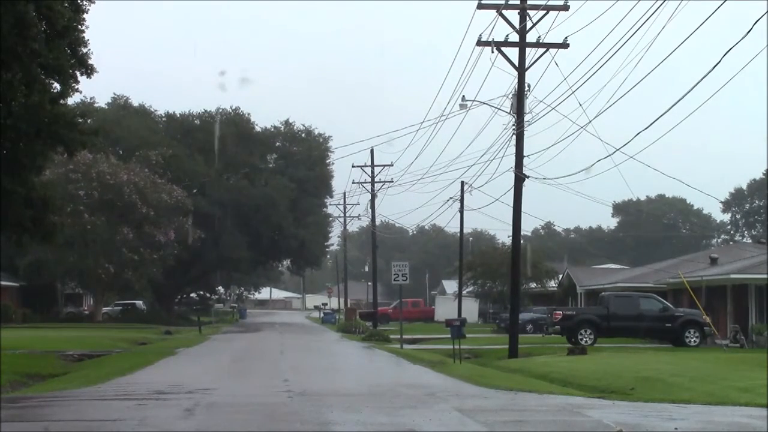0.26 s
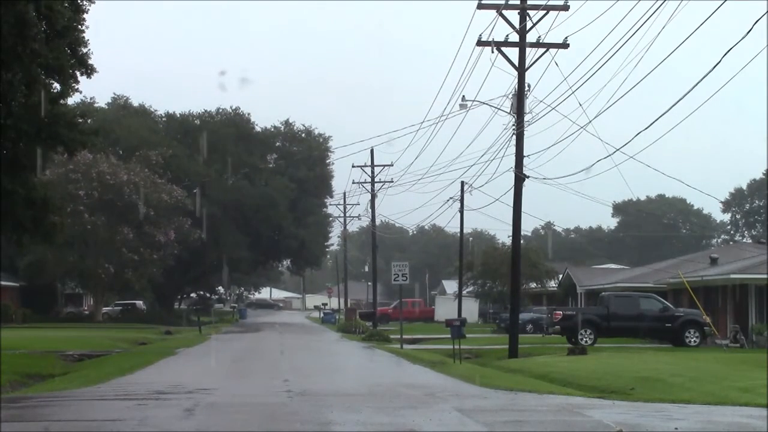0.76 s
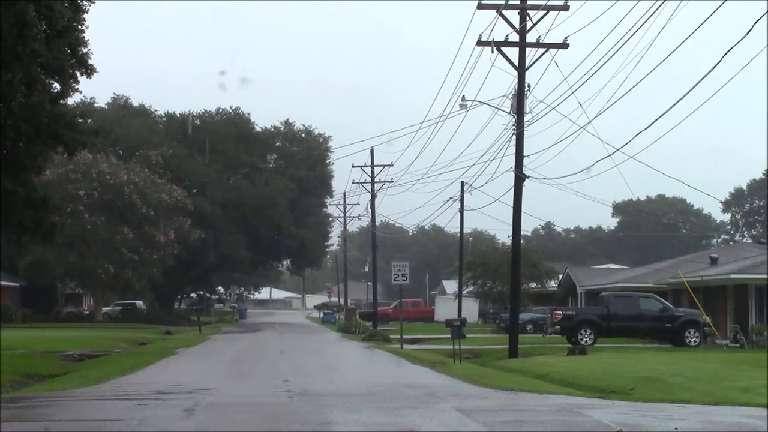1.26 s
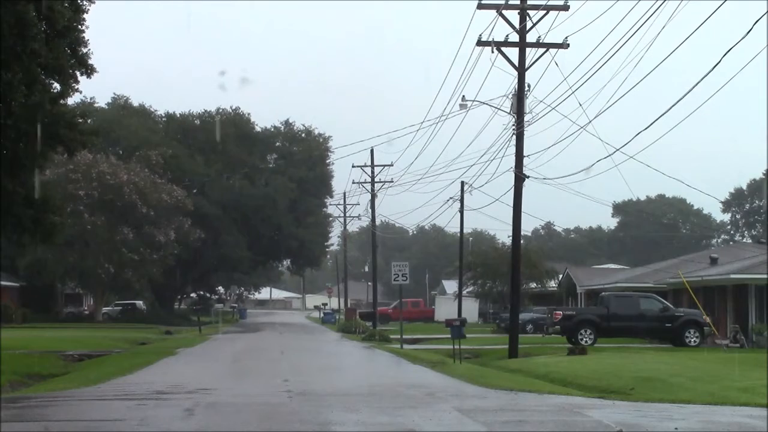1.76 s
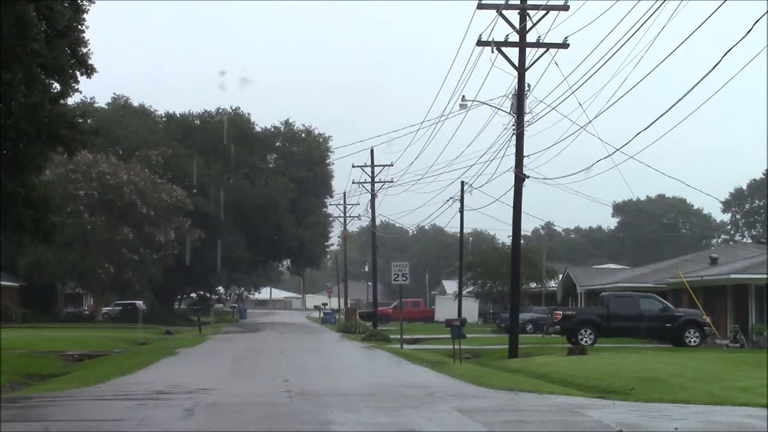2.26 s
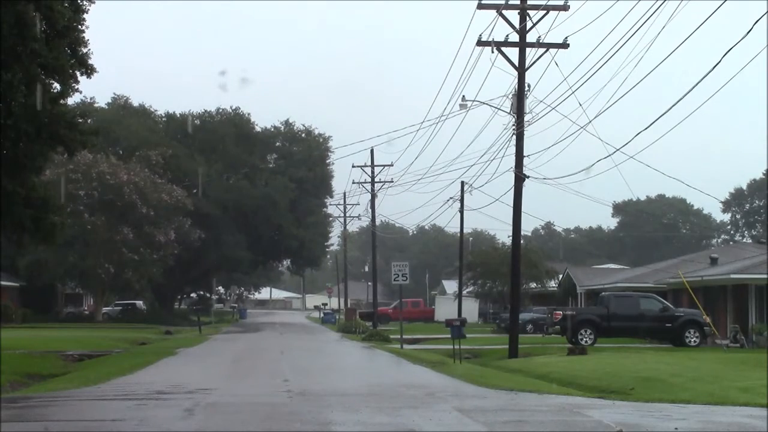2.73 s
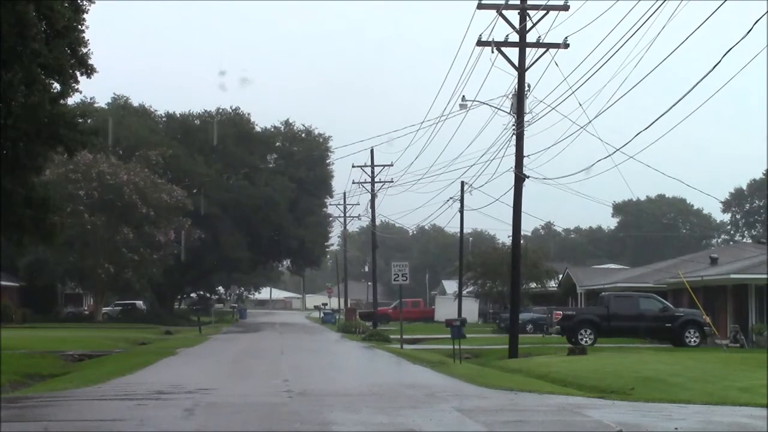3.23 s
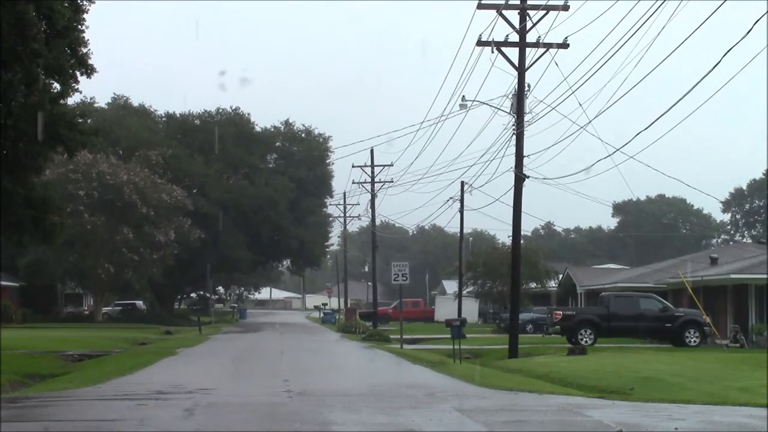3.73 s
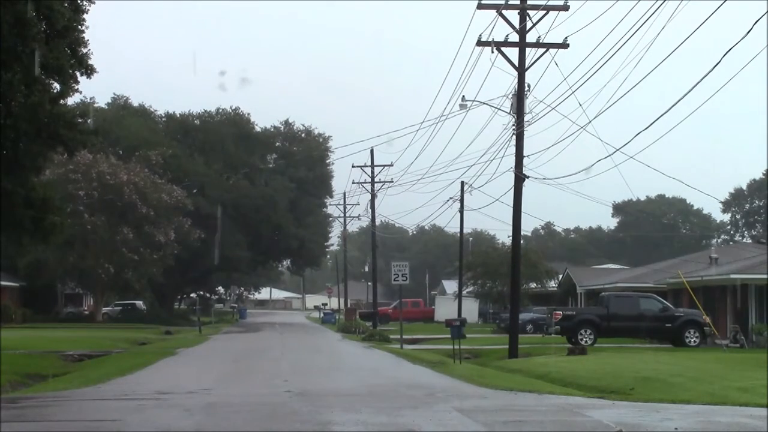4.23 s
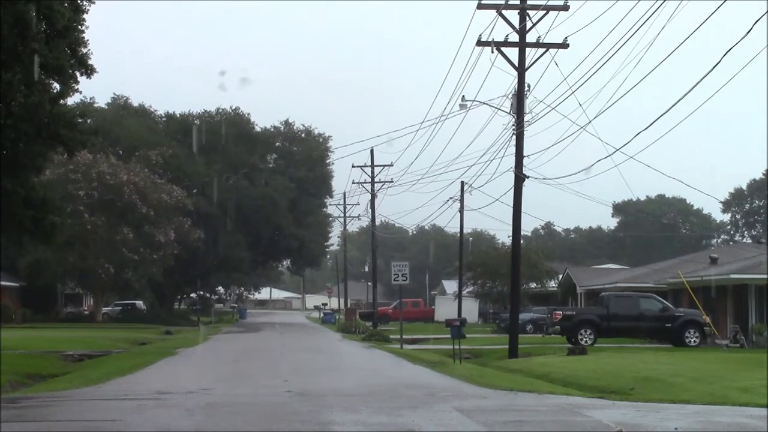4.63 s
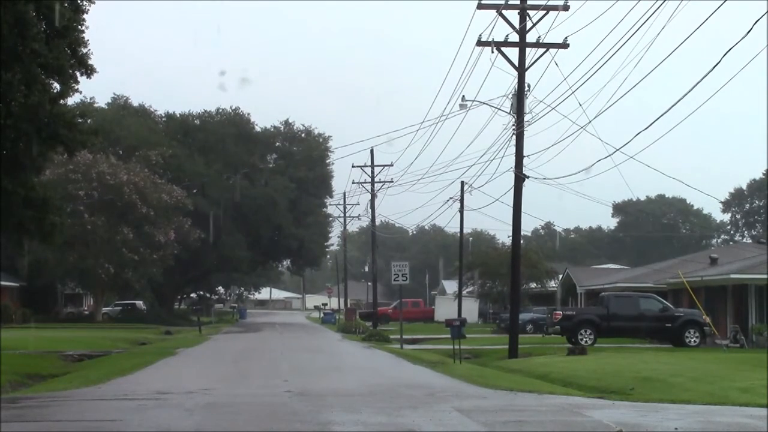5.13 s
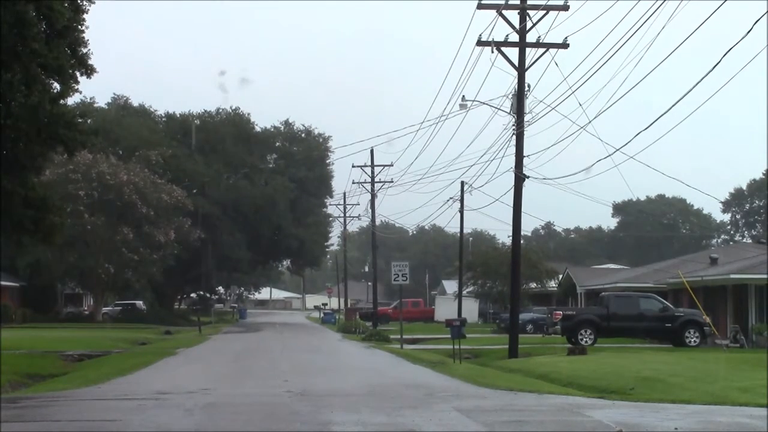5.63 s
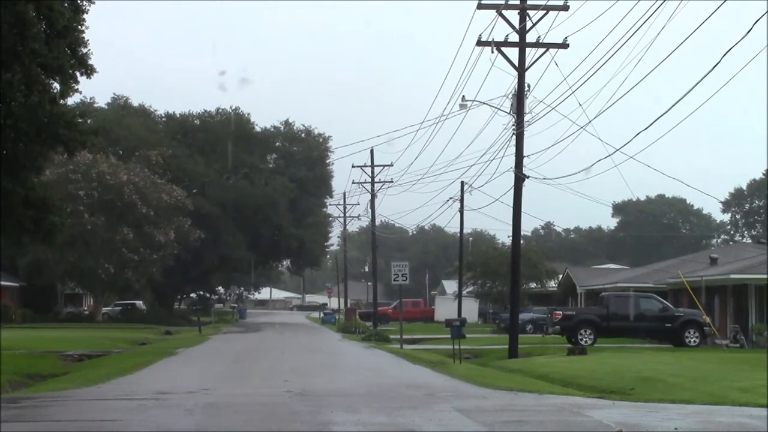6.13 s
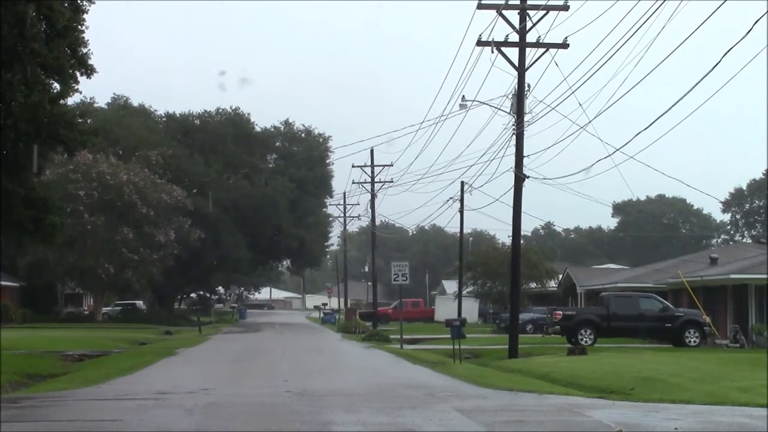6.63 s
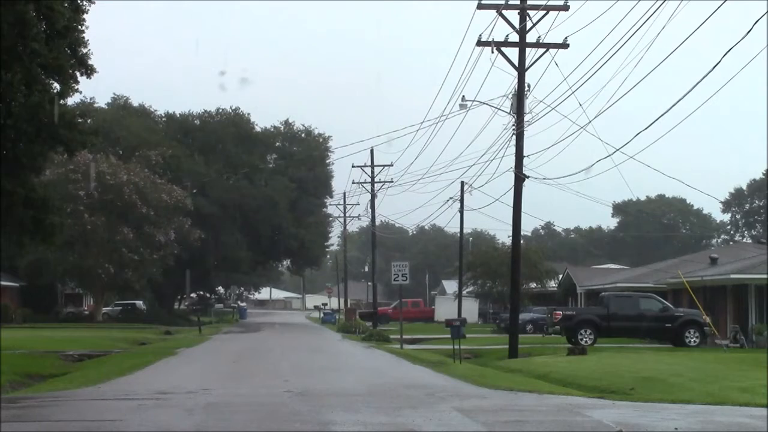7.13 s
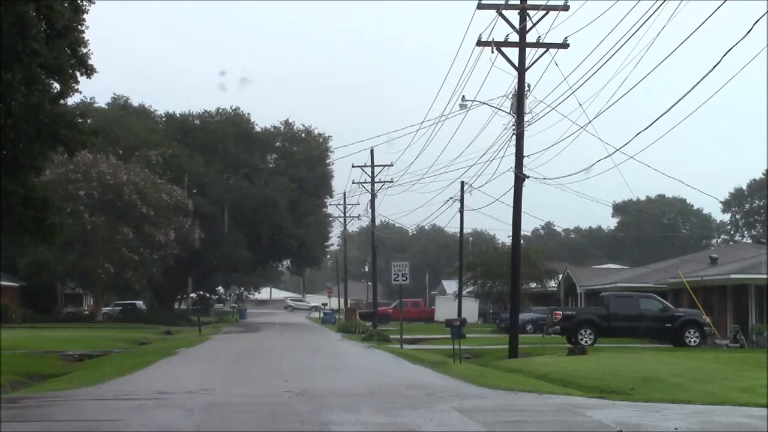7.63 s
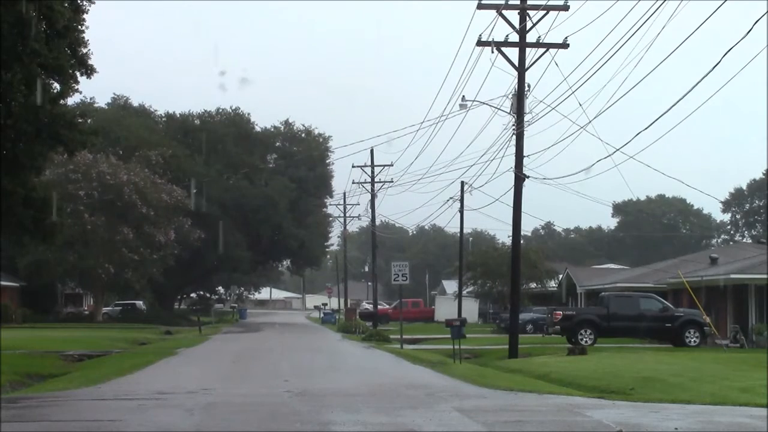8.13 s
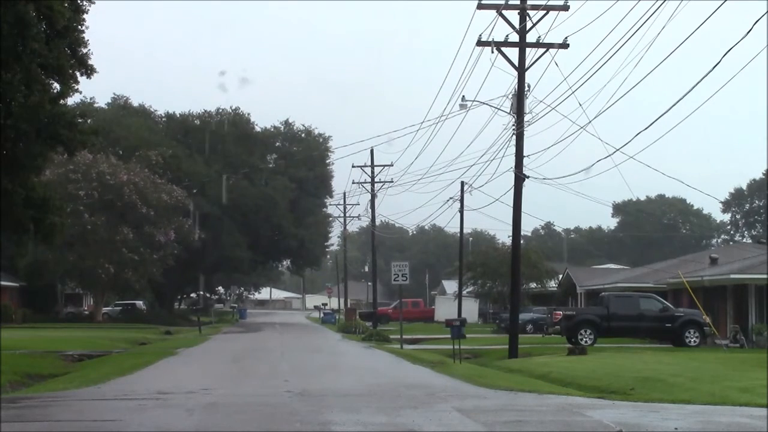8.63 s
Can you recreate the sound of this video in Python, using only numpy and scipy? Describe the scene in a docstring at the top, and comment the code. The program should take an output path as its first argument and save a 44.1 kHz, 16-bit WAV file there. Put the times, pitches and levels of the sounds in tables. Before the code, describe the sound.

Steady rain on a residential street, heard from under a covered porch through a small microphone with little deepest bass. A mid-to-bright grainy hiss runs throughout, with fine patter and treble fizz. Fat eave drips hit wet concrete irregularly, several each second: clattering splats with soft spray tails, one especially strong near 3.9 s. A few dull hollow knocks come between 0.4 and 2.5 s, and thin bright ticks at about 0.8 and 7.5 s. A low thunder tail starts the scene, swells weakly around 1 s, and fades, nearly gone by 3.5 to 4.4 s. At 4.5 s a nearer roll enters suddenly, booming in quick uneven surges with a rough growl and slight crackle, and peaks around 5.9 s, covering the rain. It drops after about 6.2 s, rumbles on with lumpy swells near 7 to 8 s, and remains as a softer grumble until the end at about 8.9 s.

```python
"""Fat drips splat on wet concrete in steady rain, on a residential street heard from under a porch.
The tail of one thunder roll fades; a nearer roll arrives suddenly at 4.5 s, peaks and eases.
Thunder is banded random shocks through porch resonances, shaped by short surges and dips.
Rain is dense clicks and noise; drips are ringing splats with spray and mist.
Knocks, ticks, patter and fizz are short noise bursts or click rings."""
import sys
import numpy as np
from scipy import signal
from scipy.io import wavfile
from scipy.ndimage import uniform_filter1d

SR = 44100
rng = np.random.default_rng(int(sys.argv[2]) if len(sys.argv) > 2 else 0)


def inscribe(sig):
    """Save sig as 16-bit PCM at rate SR to the path in sys.argv[1].

    A 1-D sig is mono; a 2-D sig holds one channel per row.
    Samples are clipped to [-1, 1] before scaling.
    """
    pcm = np.round(np.clip(np.atleast_2d(sig).T, -1, 1) * 32767)
    wavfile.write(sys.argv[1], SR, pcm.astype(np.int16))


N = 391166

# Thunder range levels before surges and dips: time_s, deep_db, low_db, boom_db, upper_boom_db, growl_db
ROLL_LEVELS = [(0.0, -39, -57, -39, -44.5, -50), (0.16, -67, -57, -46, -47.5, -56.5),
               (0.9, -56, -49, -40, -42.5, -54.5), (1.15, -61, -66, -43.5, -50.5, -51.5),
               (1.22, -64, -56.5, -49.5, -48.5, -60.5), (2.01, -68, -62, -46.5, -54, -58),
               (2.52, -64, -51.5, -45, -49.5, -58), (2.69, -69, -60, -51.5, -51.5, -59),
               (2.96, -58, -49.5, -45, -59, -60.5), (2.98, -55, -53.5, -45.5, -49.5, -57.5),
               (3.51, -75, -60.5, -56, -56.5, -59.5), (4.43, -79, -71, -49, -47, -48.5),
               (4.48, -63, -64, -46, -45, -53), (4.5, -66, -42, -26.5, -36.5, -49),
               (4.69, -66, -47, -32, -40, -42.5), (4.78, -54, -46, -30.5, -36, -43),
               (4.84, -65, -38, -29, -30, -39), (4.99, -58, -30, -32, -33, -30),
               (5.09, -64, -43, -24.5, -31.5, -38), (5.21, -52, -32, -38, -34, -33.5),
               (5.29, -53, -45, -27.5, -26.5, -31), (5.4, -64, -34, -31.5, -29, -33.5),
               (5.49, -50, -38.5, -40, -29.5, -31.5), (5.58, -46, -33.5, -27.5, -28.5, -34.5),
               (5.71, -50, -40, -25.5, -29, -34.5), (5.85, -43, -27.5, -24.5, -18, -30),
               (5.89, -46, -34, -16.5, -24, -28), (6.07, -47, -39, -33.5, -26.5, -32),
               (6.12, -50, -46, -23, -27.5, -32.5), (6.64, -61, -49.5, -38.5, -37.5, -39),
               (7.68, -62, -46, -33, -33.5, -38), (8.05, -69, -54.5, -47.5, -39, -38.5),
               (8.19, -56, -62, -37.5, -32.5, -38.5), (8.55, -60, -39, -41.5, -31.5, -33),
               (8.7, -63, -57, -35.5, -37, -36.5), (8.75, -55, -36.5, -40.5, -34.5, -36),
               (8.87, -71, -54, -39, -35, -34.5)]
# Roll spectrum, relative within each range: freq_hz, level_db
ROLL_SPECTRUM = [(15, -65), (40, -22), (59, -34), (100, -12.5), (182, 3.5), (285, -6.5), (356, -11),
                 (468, -15.5), (528, -19.5), (706, -24), (782, -20), (961, -37), (1140, -36), (1500, -41.5),
                 (1950, -74), (3300, -120)]
# Crackle relative to growl: time_s, level_db
CRACKLE_LEVELS = [(0.0, -22), (4.4, -8), (5.0, -13.5), (5.9, -14), (7.0, -9), (7.6, -9), (8.1, -11),
                  (8.87, -12.5)]
DEEP_SURGE_SHARE = 0.6   # share of the boom change given to the deep and low ranges
FAR_TILT_END_S, FAR_TILT_DB = 4.0, 4   # tilt toward the low end; fades out over the last second


def thunder():
    """Countless shocks from the crooked channel arrive smeared together; each range swells on its own."""
    deep_db, low_db, boom_db, upper_db, growl_db = in_time(ROLL_LEVELS)
    crackle_db = in_time(CRACKLE_LEVELS)[0]
    boom_change_db, growl_change_db = surges()
    deep_change_db = DEEP_SURGE_SHARE * boom_change_db

    edges_hz = 25 * 2 ** (np.arange(2, 19) / 3)
    shocks = [impacts(3000, spread_db=2.0, size=N) for _ in range(2)]
    bands = coloured(shocks, ROLL_SPECTRUM, edges_hz, patchy_db=1.0, rate_hz=9)
    ranges = np.split(bands, np.searchsorted(edges_hz, [79, 125, 199, 300, 620]))

    far_db = FAR_TILT_DB * np.clip(FAR_TILT_END_S - np.arange(N) / SR, 0, 1)
    for k in (3, 4):   # upper boom and growl
        tilt = np.linspace(1, -2, len(ranges[k]))
        ranges[k] = ranges[k] * from_db(np.outer(tilt, far_db))

    levels_db = (deep_db + deep_change_db,
                 low_db + deep_change_db,
                 boom_db + boom_change_db,
                 upper_db + boom_change_db,
                 growl_db + growl_change_db,
                 growl_db + growl_change_db + crackle_db)
    roll = np.zeros(N)
    for level_db, part in zip(levels_db, ranges):
        roll += from_db(level_db) * evened(porch(part.sum(0)), seconds=0.035, share=0.15)
    return roll


# Short surges and dips in the roll: start_s, boom_change_db, growl_change_db, length_s
ROLL_SURGES = [(0.423, 5, 2, 0.06), (0.735, 2.5, -8, 0.051), (1.021, 5.5, 1, 0.023), (1.1, 7.5, 0, 0.068),
               (2.982, 3, 1, 0.036), (4.224, 5, 4.5, 0.053), (4.497, 3, -6, 0.04), (4.585, 4.5, 7, 0.038),
               (4.735, 6, 3, 0.043), (4.874, 6, 2.5, 0.043), (4.962, 12, -1.5, 0.022),
               (5.043, -1, 2.5, 0.064), (5.222, 2, 4.5, 0.05), (5.406, 4.5, 0.5, 0.054),
               (5.52, 7.5, 1, 0.085), (5.603, -1.5, 7, 0.047), (5.704, 1.5, 3.5, 0.036),
               (5.805, -1, -0.5, 0.14), (5.928, 10.5, 3, 0.011), (5.973, 5.5, 1, 0.031),
               (6.08, 5.5, 0, 0.068), (6.175, 7.5, 0, 0.015), (6.267, 5.5, 1.5, 0.065),
               (6.32, 5, 0.5, 0.05), (6.463, 4.5, 1, 0.18), (6.927, 8.5, -1, 0.021),
               (6.974, 8.5, -6, 0.022), (7.142, 4.5, -2.5, 0.075), (7.342, 5, 4.5, 0.084),
               (7.516, -2, 4.5, 0.16), (7.676, 3.5, 3.5, 0.029), (7.826, 5, 0.5, 0.047),
               (7.975, 9, -1, 0.087), (8.217, 4.5, 4.5, 0.036), (8.347, 6.5, -5, 0.022),
               (8.48, -3, -4, 0.052), (8.707, 4, 2, 0.03)]
SURGE_RISE_S = 0.027


def surges():
    """Each row shifts boom and growl levels up or down quickly, then lets them return; both curves in dB."""
    t, change_db = np.arange(N) / SR, np.zeros((2, N))
    for start_s, *peak_change_db, length_s in ROLL_SURGES:
        after_s = np.maximum(t - start_s, 0)
        shape = (1 - np.exp(-after_s / SURGE_RISE_S)) * np.exp(-(after_s / length_s) ** 2)
        change_db += np.outer(peak_change_db, shape / shape.max())
    return change_db


# Porch resonances, in series: freq_hz, width_hz, boost_db
PORCH_RESONANCES = [(174.3, 15.5, 3.5), (194, 650, 5), (535.3, 39, 6.5), (811, 76, 6), (1138, 32, 8.5),
                    (1350, 90, 3.5)]


def porch(x):
    """The covered porch lifts a few resonances."""
    for hz, width_hz, boost_db in PORCH_RESONANCES:
        x = x + (from_db(boost_db) - 1) * resonance(x, hz, width_hz)
    return x


# Drips from the eave, nominal levels:
# start_s, splat_peak_db, splat_centre_hz, spray_level_db, mist_re_spray_db, decay_s
EAVE_DRIPS = [(.0094,-38.5,2550,-67,-9,0.18),(.138,-35,2820,-47,-14,0.31),(.416,-38,3400,-48,-18,0.38),(0.668,-46,4150,-43.5,-14,0.091),(.765,-51,3700,-46.5,-24,0.19),(0.838,-59,2400,-50,-13,0.14),(1.033,-33,2780,-47,-9,0.23),(1.0658,-35,2670,-46.5,-27,0.22),(1.2497,-42,3800,-54,-9,0.21),(1.3366,-34.5,2860,-68,-12,0.27),(1.373,-40,2920,-56,-16,0.2),(1.546,-39.5,3520,-54,-11,0.13),(1.6287,-38.5,2850,-45.5,-13,0.19),(1.8926,-42,3750,-51,-11,0.14),(1.992,-44.5,3750,-60,-12,0.36),(2.04,-38,2350,-61,-9,0.2),(2.1014,-43.5,3270,-57,-15,0.38),(2.2825,-33,3100,-45.5,-23,0.2),(2.4127,-44,3000,-51.5,-17,0.27),(2.4753,-38,3400,-63,-9,.22),(2.848,-43,3000,-50,-19,0.28),(2.9195,-45,3050,-39,-23,0.081),(3.118,-41.5,3560,-51,-14,0.26),(3.201,-40,3400,-57,-9,0.26),(3.3374,-59,4100,-48.5,-16,0.17),(3.489,-55,2800,-58,-9,0.44),(3.5796,-43,2940,-54,-16,0.34),(3.6787,-56,2900,-57,-11,.3),(3.7952,-39,3400,-52.5,-9,0.25),(3.8356,-41,3230,-53,-12,0.22),(3.92,-28,2520,-43,-19,0.16),(3.9466,-34,2740,-68,-15,0.23),(4.086,-54,3500,-64,-9,0.16),(4.1994,-45,3200,-70,-9,0.23),(4.4494,-52,2200,-52,-1,0.086),(4.664,-42.5,3650,-52.5,-17,0.2),(4.8766,-36,3020,-57,-11,0.27),(4.9574,-44.5,3430,-75,-9,0.42),(5.154,-38.5,2930,-68,-16,0.34),(5.187,-38.5,3100,-68,-16,0.31),(5.217,-38.5,3650,-61,-16,0.24),(5.3214,-40.5,3670,-50,-16,0.25),(5.342,-43.5,3700,-66,-13,0.32),(5.444,-44,3320,-58,-15,.27),(5.683,-43.5,3060,-55.5,-19,0.26),(5.881,-37,2600,-49,-14,0.12),(5.915,-44,2400,-62,-14,.3),(5.944,-44,2730,-66,-14,.25),(5.978,-42,3860,-61,-12,0.22),(6.002,-43,3930,-58,-17,0.28),(6.3056,-47,3380,-52.5,-23,0.29),(6.5854,-42,3080,-66,-9,0.33),(6.611,-43,3070,-64,-9,.25),(6.6484,-42.5,2850,-61,-11,.25),(6.8653,-53,2580,-46,-20,0.16),(6.9196,-34,2870,-49.5,-32,0.23),(7.0784,-55,3250,-53.5,-20,0.29),(7.2225,-43,3550,-52,-11,0.23),(7.248,-47,3350,-55,-16,0.25),(7.371,-42,3730,-66,-11,0.2),(7.524,-55,2950,-54,-4,0.14),(7.6944,-60,3200,-62,-9,0.28),(7.794,-47,3220,-63,-14,0.43),(7.9194,-62,2850,-52,-13,0.27),(7.953,-39.5,2700,-55,-16,0.34),(8.0332,-44.5,3500,-55,-9,0.36),(8.278,-44.5,2600,-74,-9,0.35),(8.321,-46,3600,-64,-7,0.55),(8.558,-49,3720,-50,-9,0.19),(8.758,-54,3400,-50.5,-15,0.26)]
NOMINAL_CREST_DB = 11.5   # assumed peak over rms, also for knocks and ticks
SPLAT_SPREAD_OCT = 0.62   # droplet pitches each side of the centre, before jitter
CLATTER_DB, CLATTER_RATE_HZ = 4, 140
SMACK_DB, SMACK_S = 3, 0.006   # extra level at first contact
SPLAT_RISE_S, SPRAY_RISE_S = 0.0025, 0.02
SPRAY_PATCH_DB, SPRAY_PATCH_RATE_HZ = 3, 25
SPRAY_REF_HZ, SPRAY_HZ_PER_DB = 7020, -72   # reference for a -46.5 dB splat; weaker drips spray finer
MIST_LOW_HZ, MIST_HIGH_HZ = 7400, 12400


def drips():
    """A drip bursts into droplets: a clattering splat, then a finer spray and a thin bright mist."""
    out, t = np.zeros(N + SR), np.arange(SR // 3) / SR
    size = len(t)
    lumps = from_db(CLATTER_DB * drift(CLATTER_RATE_HZ))
    patches = from_db(SPRAY_PATCH_DB * drift(SPRAY_PATCH_RATE_HZ))
    smack = from_db(SMACK_DB * np.exp(-t / SMACK_S))
    for start_s, peak_db, centre_hz, spray_db, mist_db, decay_s in EAVE_DRIPS:
        octaves = SPLAT_SPREAD_OCT * (np.linspace(-1, 1, 5) + rng.uniform(-1, 1, 5) / 4)
        core = np.zeros(size)
        for weight, hz in zip(np.hamming(7)[1:6], centre_hz * 2 ** octaves):
            clicks = impacts(500, spread_db=-0.5, size=size) + 0.5 * rng.standard_normal(size)
            ring = resonance(resonance(clicks, hz, hz / 4), hz, hz / 4)
            core += weight * excerpt(lumps, size) * ring
        splat = from_db(peak_db - NOMINAL_CREST_DB) * evened(core, seconds=0.025, share=0.8) * smack

        droplets = impacts(1800, spread_db=-1.5, size=size) + 2.9 * rng.standard_normal(size)
        spray_hz = SPRAY_REF_HZ + SPRAY_HZ_PER_DB * (peak_db + 46.5)
        cuts_hz = np.geomspace(spray_hz / 2.21, spray_hz * 1.27, 5)
        spray = np.zeros(size)
        for low_hz, high_hz in zip(cuts_hz, cuts_hz[1:]):
            spray += excerpt(patches, size) * band(droplets, low_hz, high_hz)
        mist = from_db(mist_db) * rms_one(band(droplets, MIST_LOW_HZ, MIST_HIGH_HZ))
        fine = from_db(spray_db) * (rms_one(spray) + mist)

        i = round(start_s * SR)
        out[i:i + size] += splash_shape(t, SPLAT_RISE_S, decay_s) * splat
        out[i:i + size] += splash_shape(t, SPRAY_RISE_S, decay_s) * fine
    return out[:N]


def splash_shape(t, rise_s, decay_s):
    """Quick rise, a short hold, then dying away; the bare exponential falls 60 dB in decay_s."""
    fall = np.log(1000) * t / decay_s
    return (1 - np.exp(-t / rise_s)) * (1 + 1.2 * fall) * np.exp(-fall)


# Drips on something hollow, nominal levels: start_s, peak_db
HOLLOW_KNOCKS = [(.45, -39), (1.105, -38), (1.29, -42), (1.77, -41), (2.433, -38)]
KNOCK_HZ, KNOCK_WIDTH_HZ = 510, 80   # each of two resonances in series
KNOCK_RISE_S, KNOCK_DECAY_S = 0.0023, 0.18


def knocks():
    """A drip on a hollow thing: a short dull ring of noise."""
    out, t = np.zeros(N), np.arange(SR // 3) / SR
    for start_s, peak_db in HOLLOW_KNOCKS:
        noise = rng.standard_normal(len(t))
        for _ in range(2):
            noise = resonance(noise, KNOCK_HZ, KNOCK_WIDTH_HZ)
        ring = splash_shape(t, KNOCK_RISE_S, KNOCK_DECAY_S) * evened(noise, seconds=0.02, share=0.8)
        i = round(start_s * SR)
        out[i:i + len(t)] += from_db(peak_db - NOMINAL_CREST_DB) * ring
    return out


# Close drops on something hard, nominal levels: start_s, peak_db
CLOSE_TICKS = [(0.767, -37), (7.526, -30)]
TICK_LOW_HZ, TICK_HIGH_HZ, TICK_T60_S = 5500, 11200, 0.06


def ticks():
    """A drop landing close by on something hard: a thin, very short bright tick."""
    out, t = np.zeros(N), np.arange(SR // 10) / SR
    for start_s, peak_db in CLOSE_TICKS:
        noise = rms_one(band(rng.standard_normal(len(t)), TICK_LOW_HZ, TICK_HIGH_HZ))
        snap = noise * from_db(-60 * t / TICK_T60_S)
        i = round(start_s * SR)
        out[i:i + len(t)] += from_db(peak_db - NOMINAL_CREST_DB) * snap[:N - i]
    return out


PATTER_PER_S, PATTER_RMS_DB, PATTER_CYCLES = 300, -69, 18.0   # cycles to fall 60 dB


def patter():
    """Single nearer drops: each excites one of 16 short resonances, ringing shorter toward the treble."""
    taps = impacts(PATTER_PER_S, spread_db=2.0, size=N)
    dealt = rng.integers(0, 16, N)
    out = np.zeros(N)
    for k, hz in enumerate(np.geomspace(1300, 7000, 16)):
        out += resonance(taps * (dealt == k) + 1e-18, hz, 2.2 * hz / PATTER_CYCLES) / hz
    return from_db(PATTER_RMS_DB) * rms_one(out)


FIZZ_PER_S, FIZZ_RMS_DB = 1500, -66
FIZZ_CLUMP_DB, FIZZ_CLUMP_RATE_HZ = 3, 14


def fizz():
    """Tiny droplets burst on wet ground in clumps: each rings a few cycles at one of 10 treble pitches."""
    clumps = from_db(FIZZ_CLUMP_DB * drift(FIZZ_CLUMP_RATE_HZ))
    taps = impacts(FIZZ_PER_S, spread_db=1.5, size=N) * clumps
    dealt = rng.integers(0, 10, N)
    out = np.zeros(N)
    for k, hz in enumerate(np.geomspace(5500, 13000, 10)):
        out += resonance(taps * (dealt == k) + 1e-18, hz, hz / 6) / hz ** 2
    return from_db(FIZZ_RMS_DB) * rms_one(out)


# Rain on street, lawns and roofs: time_s, level_db
RAIN_LEVELS = [(0.0, -48.5), (0.2, -51), (1.98, -51), (2.22, -50.5), (3.6, -52), (3.78, -52), (5.5, -56),
               (6.1, -53), (7.73, -53.5), (8.87, -52)]
# Rain spectrum, relative: freq_hz, level_db
RAIN_SPECTRUM = [(350, -38), (600, -1), (700, -12.5), (820, -8.5), (966, -10), (1150, -5), (1580, -4.5),
                 (2570, -5.5), (7140, -12), (10600, -17.5), (15500, -34)]


def rain():
    """Thousands of far drops a second merge into a steady grainy hiss."""
    drops = [impacts(6000, spread_db=3.0, size=N) + 0.54 * rng.standard_normal(N) for _ in range(2)]
    edges_hz = 300 * 2 ** (np.arange(19) / 3)
    hiss = coloured(drops, RAIN_SPECTRUM, edges_hz, patchy_db=1.1, rate_hz=12).sum(0)
    return from_db(in_time(RAIN_LEVELS)[0]) * rms_one(porch(hiss))


def coloured(sources, spectrum, edges_hz, patchy_db, rate_hz):
    """Bands of two sources dealt in turn, each at its level and flickering partly with the others."""
    hz, level_db = np.transpose(spectrum)
    together, bands = drift(rate_hz), []
    for k, (low_hz, high_hz) in enumerate(zip(edges_hz, edges_hz[1:])):
        centre_db = np.interp(np.log(low_hz * high_hz) / 2, np.log(hz), level_db)
        flicker_db = patchy_db * (0.4 * together + drift(rate_hz))
        bands.append(from_db(centre_db + flicker_db) * band(sources[k % 2], low_hz, high_hz))
    return np.array(bands)


def impacts(per_s, spread_db, size):
    """Random clicks of uneven strength and sign; rms 1."""
    strength_db = spread_db * np.minimum(rng.exponential(1, size), 5)
    clicks = from_db(strength_db) * rng.choice([-1, 1], size)
    return rms_one(clicks * (rng.random(size) < per_s / SR) + 1e-9)


def drift(rate_hz):
    """Slow chance: noise through a double one-pole low-pass at SR / 40, rms 1."""
    r = np.exp(-2 * np.pi * rate_hz * 40 / SR)
    noise = rng.standard_normal(N // 40 + 2002)
    slow = signal.lfilter([1], [1, -2 * r, r * r], noise)[2000:]   # skip the filter's start-up
    return np.interp(np.arange(N) / 40, np.arange(len(slow)), rms_one(slow))


def excerpt(x, size):
    """A stretch of x from a random place."""
    start = rng.integers(N - size)
    return x[start:start + size]


def evened(x, seconds, share):
    """Chance beats slower than the given time are partly levelled out; rms 1."""
    power = uniform_filter1d(x ** 2, round(seconds * SR)) + 1e-12
    return rms_one(x / power ** (np.clip(share, 0, 1) / 2))


def resonance(x, hz, width_hz):
    """Two-pole resonance, gain 1 on top."""
    r = np.exp(-np.pi * width_hz / SR)
    gain = (1 - r * r) / 2
    return signal.lfilter([gain, 0, -gain], [1, -2 * r * np.cos(2 * np.pi * hz / SR), r * r], x)


def band(x, low_hz, high_hz):
    """Butterworth band-pass."""
    sos = signal.butter(2, [low_hz, min(high_hz, 0.45 * SR)], "band", fs=SR, output="sos")
    return signal.sosfilt(sos, x)


def in_time(rows):
    """Columns of a curve table at every sample."""
    time_s, *columns = np.transpose(rows)
    return [np.interp(np.arange(N) / SR, time_s, column) for column in columns]


def from_db(db):
    """Decibels to gain."""
    return 10 ** (np.asarray(db) / 20)


def rms_one(x):
    """Scale to unit rms."""
    return x / np.sqrt(np.mean(x ** 2) + 1e-20)


def scene():
    """All sources at one microphone."""
    return (thunder() + drips() + knocks() + ticks() + patter() + fizz() + rain())[None]


ROUNDING_LEVEL, BASS_CUT_HZ, TOP_CUT_HZ = 0.33, 45, 15740


def record(dry):
    """The small microphone rounds the loudest peaks and loses the deepest bass; the top is cut steeply."""
    rounded = ROUNDING_LEVEL * np.tanh(dry / ROUNDING_LEVEL)
    thin = signal.sosfilt(signal.butter(3, BASS_CUT_HZ, "high", fs=SR, output="sos"), rounded)
    return signal.sosfilt(signal.ellip(12, 0.5, 60, TOP_CUT_HZ, fs=SR, output="sos"), thin)


dry = scene()
out = record(dry)
inscribe(out)
```